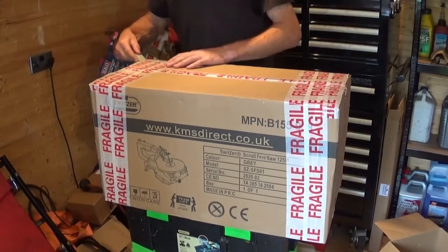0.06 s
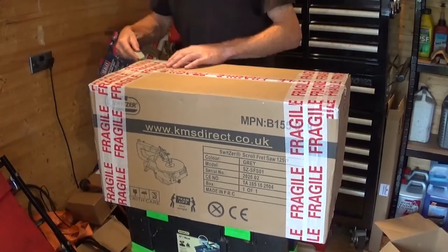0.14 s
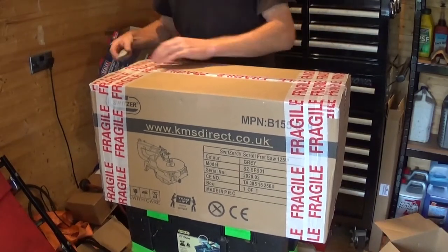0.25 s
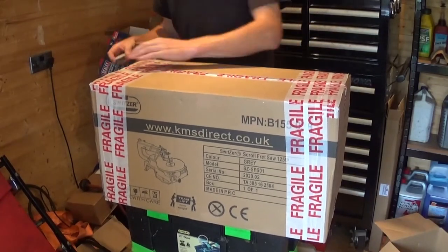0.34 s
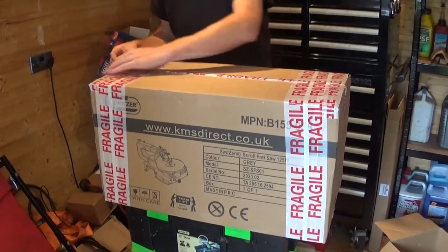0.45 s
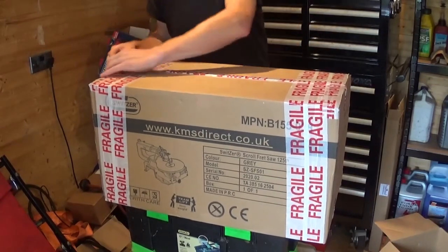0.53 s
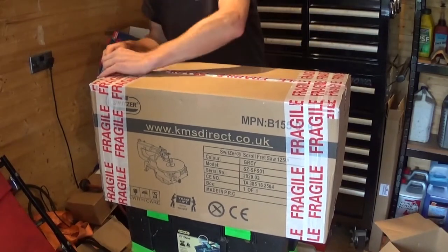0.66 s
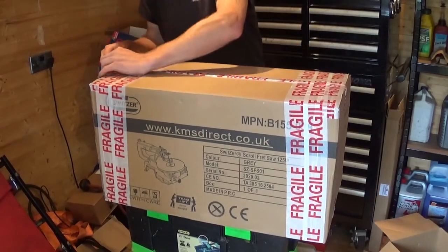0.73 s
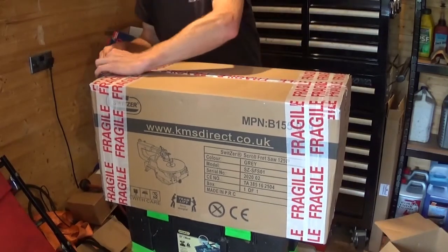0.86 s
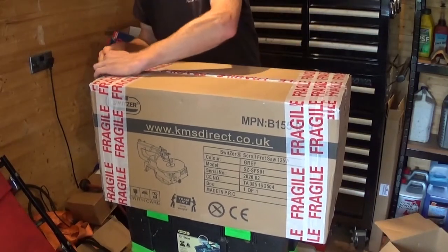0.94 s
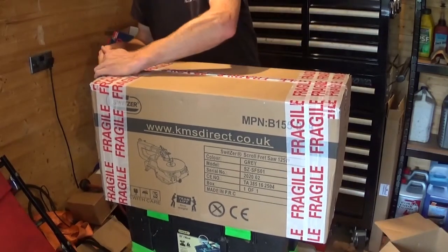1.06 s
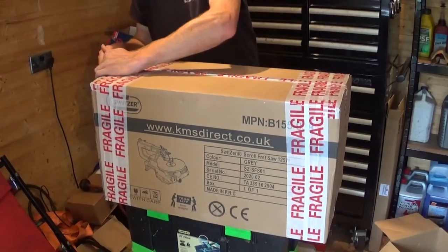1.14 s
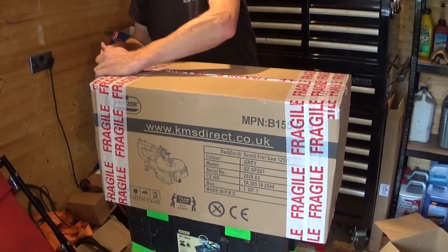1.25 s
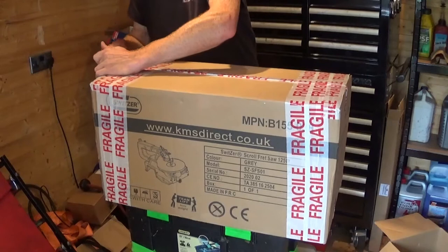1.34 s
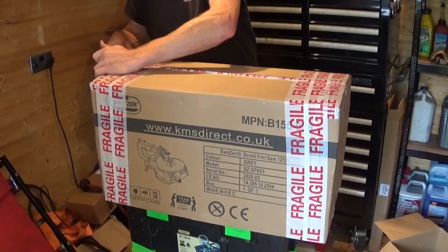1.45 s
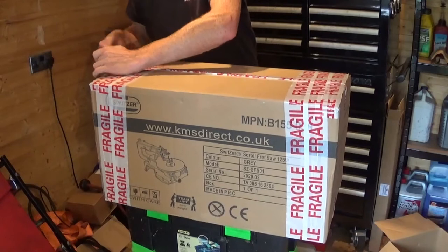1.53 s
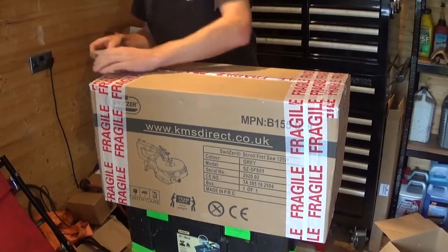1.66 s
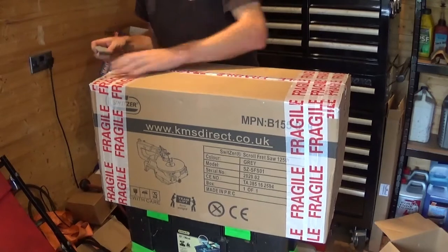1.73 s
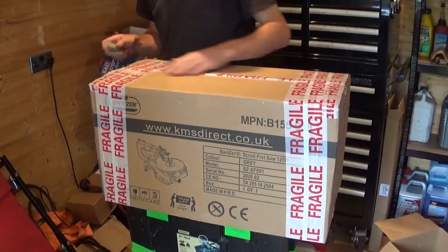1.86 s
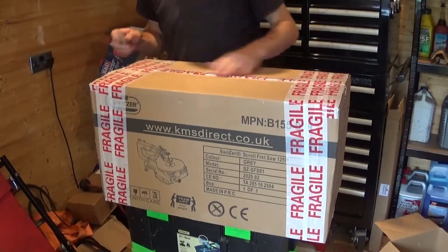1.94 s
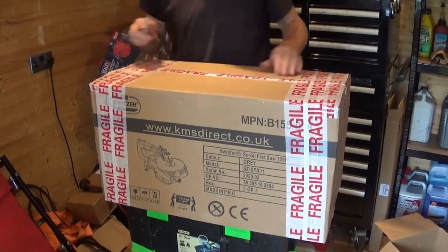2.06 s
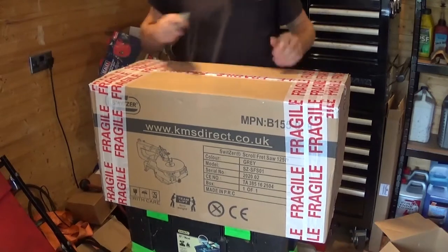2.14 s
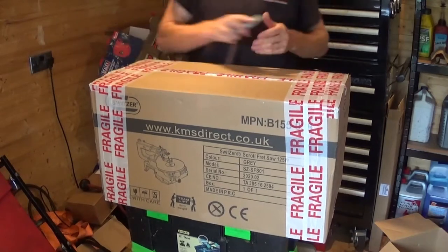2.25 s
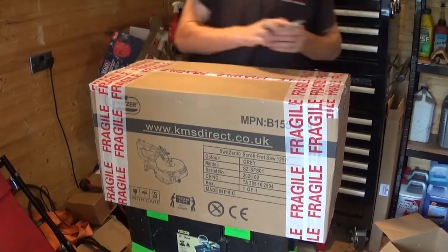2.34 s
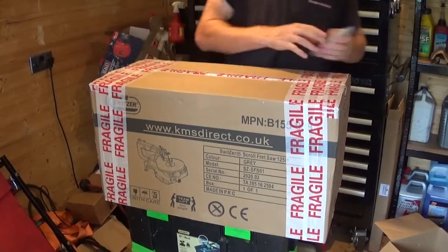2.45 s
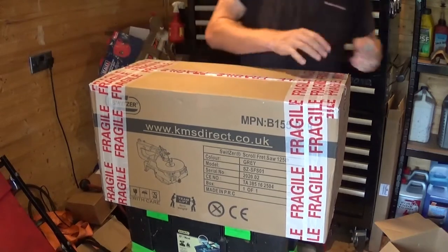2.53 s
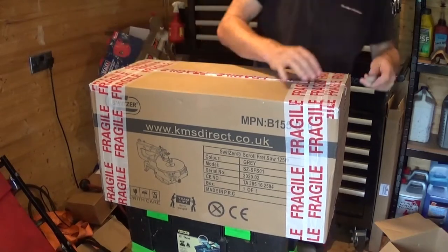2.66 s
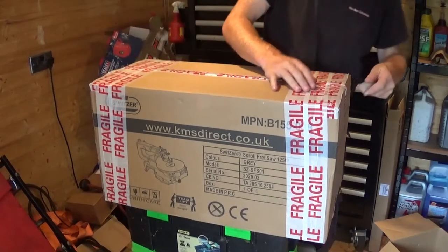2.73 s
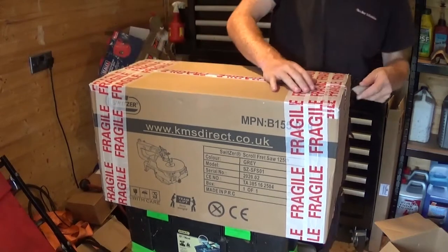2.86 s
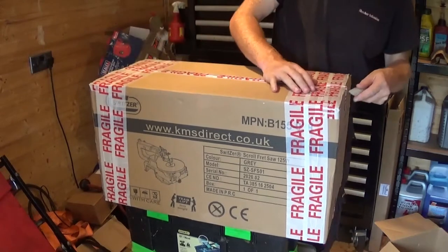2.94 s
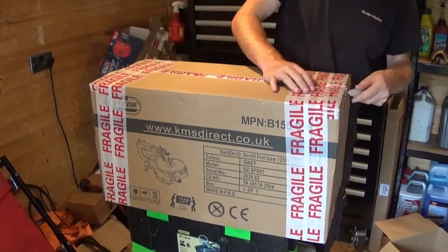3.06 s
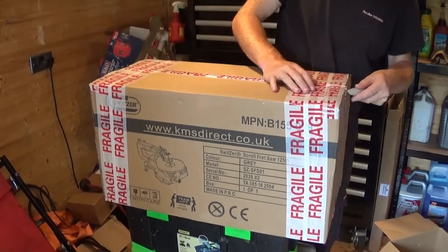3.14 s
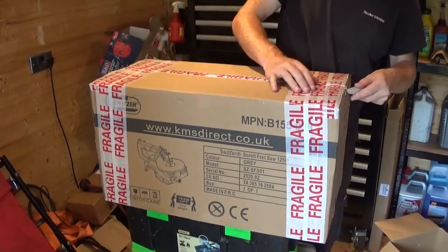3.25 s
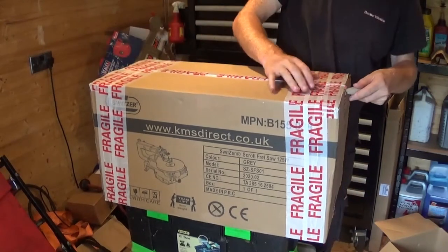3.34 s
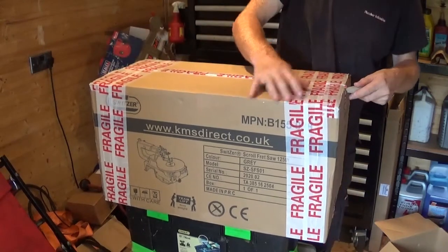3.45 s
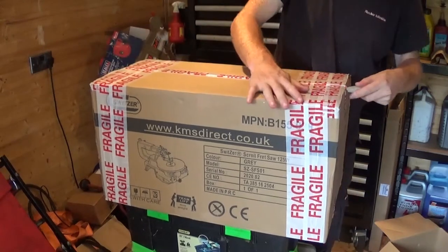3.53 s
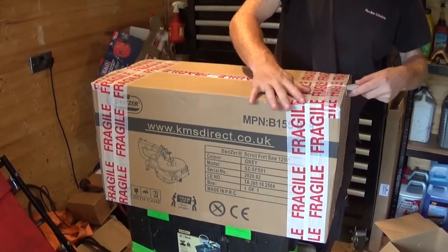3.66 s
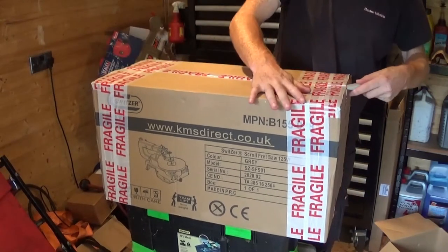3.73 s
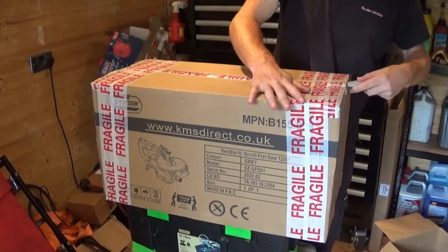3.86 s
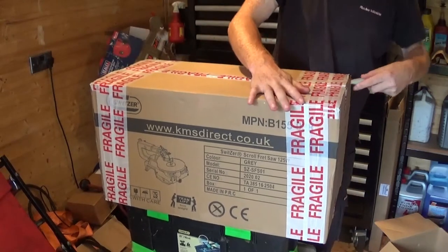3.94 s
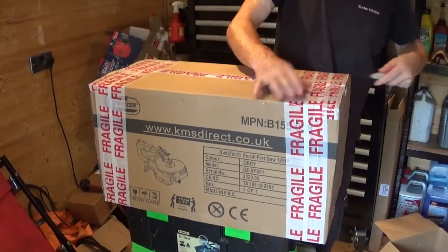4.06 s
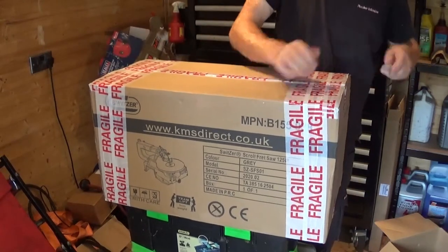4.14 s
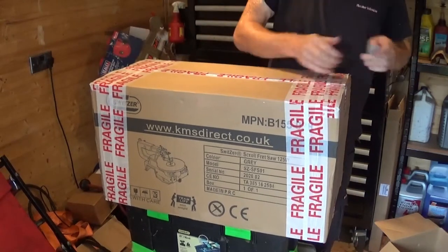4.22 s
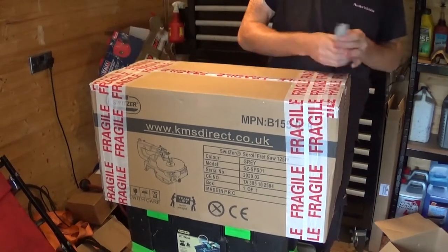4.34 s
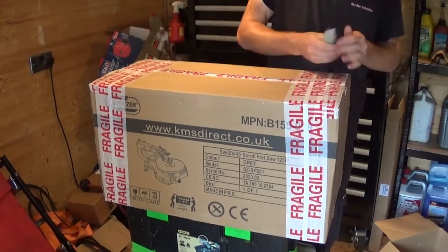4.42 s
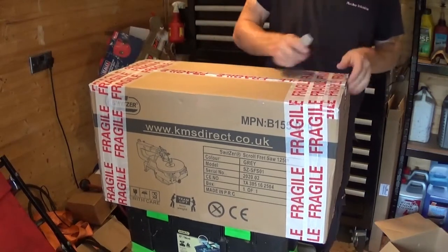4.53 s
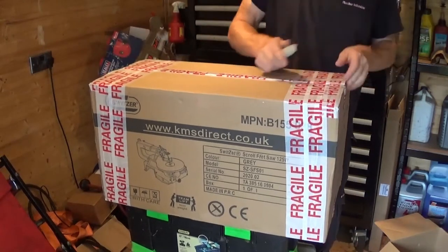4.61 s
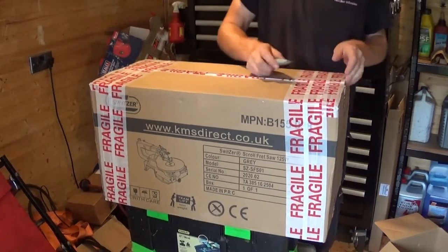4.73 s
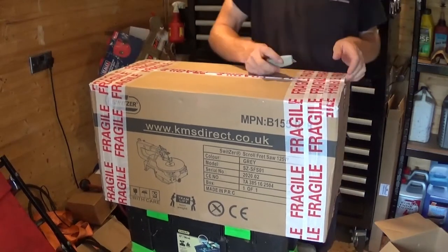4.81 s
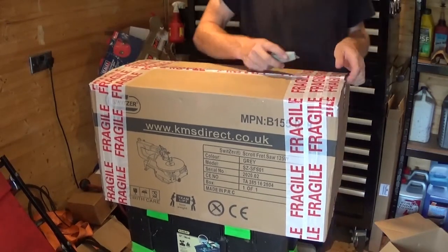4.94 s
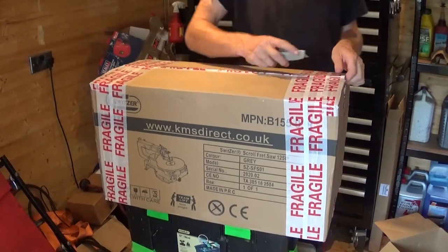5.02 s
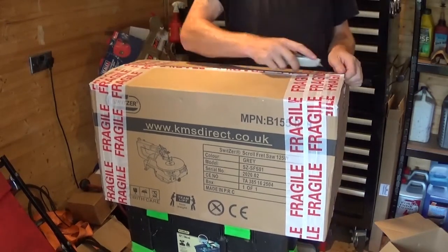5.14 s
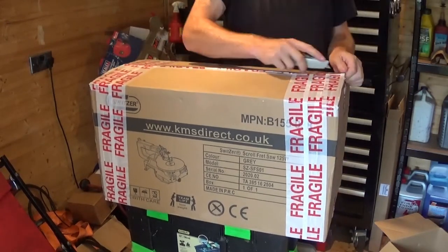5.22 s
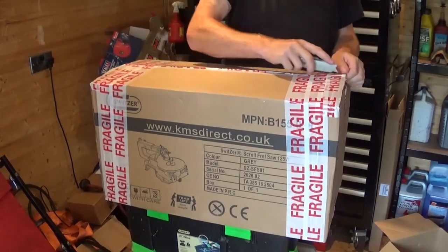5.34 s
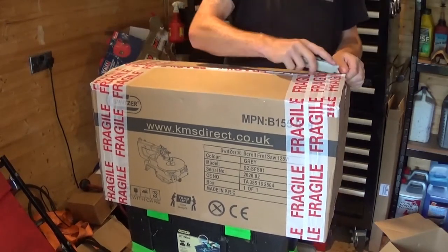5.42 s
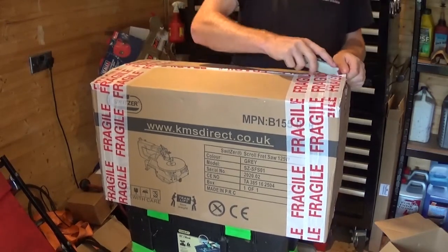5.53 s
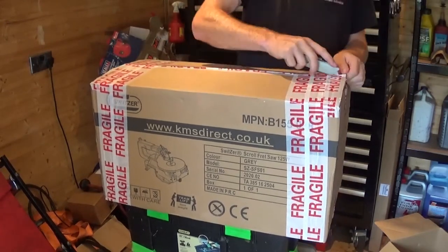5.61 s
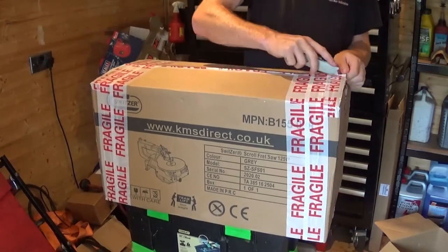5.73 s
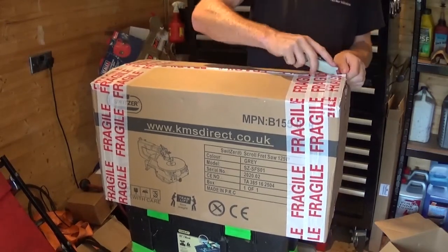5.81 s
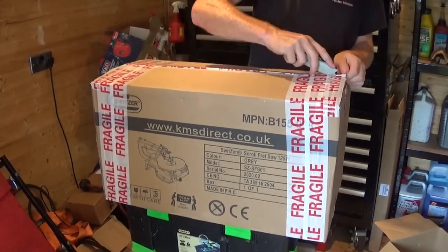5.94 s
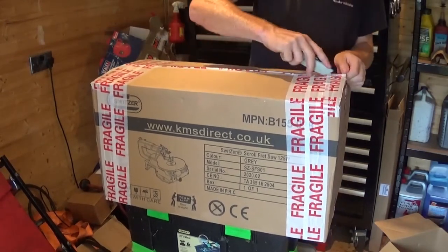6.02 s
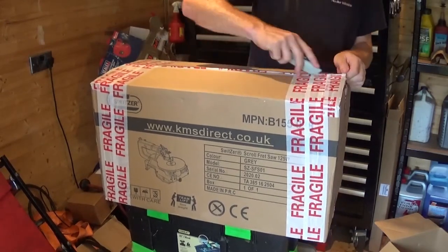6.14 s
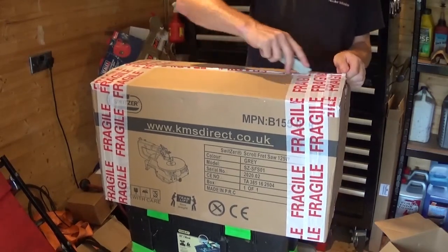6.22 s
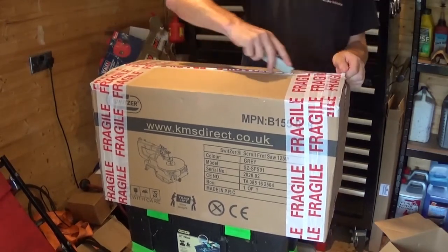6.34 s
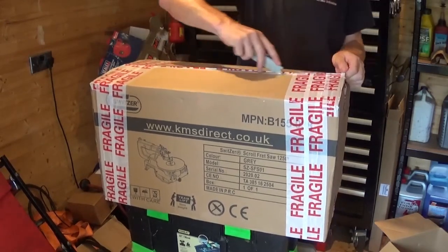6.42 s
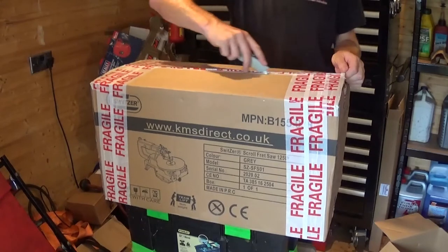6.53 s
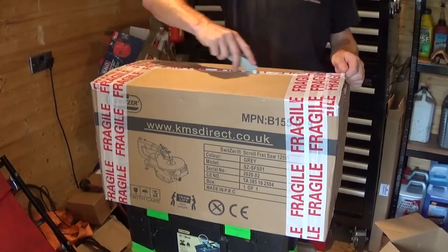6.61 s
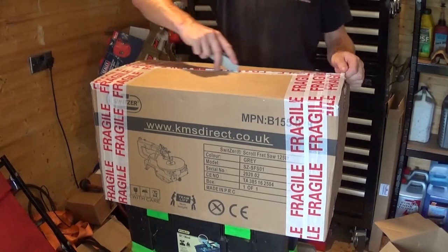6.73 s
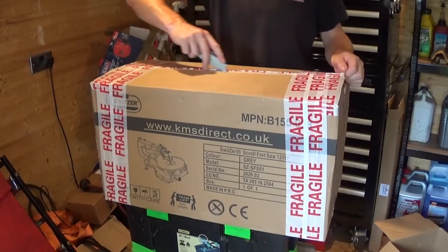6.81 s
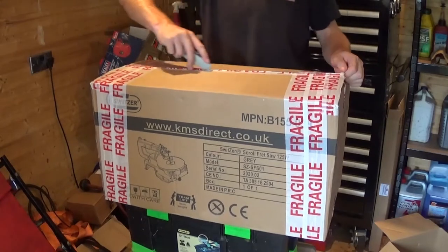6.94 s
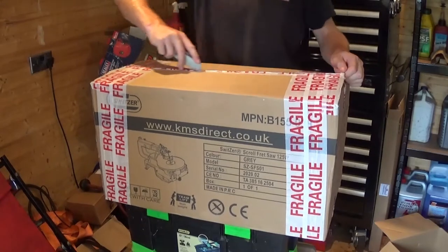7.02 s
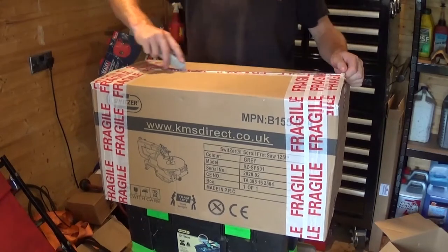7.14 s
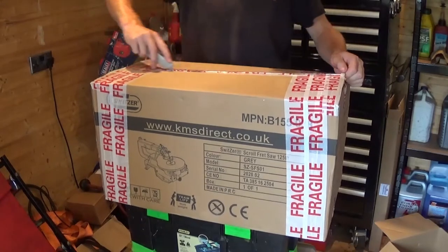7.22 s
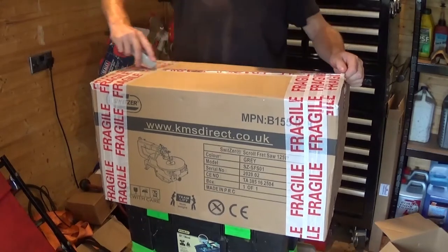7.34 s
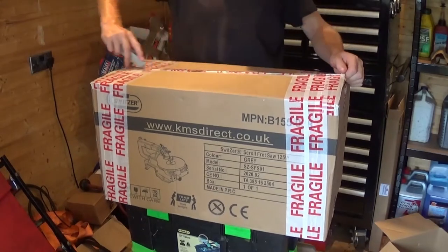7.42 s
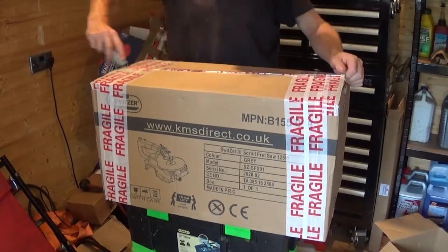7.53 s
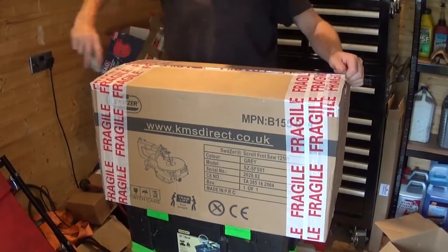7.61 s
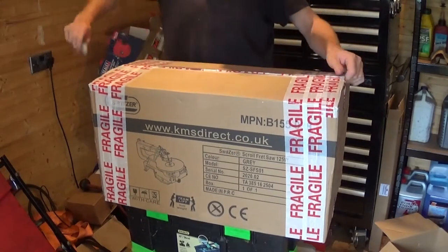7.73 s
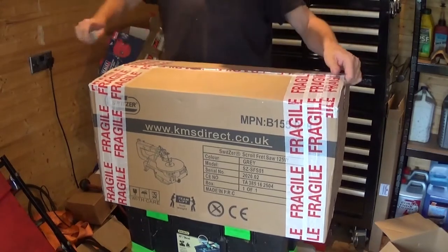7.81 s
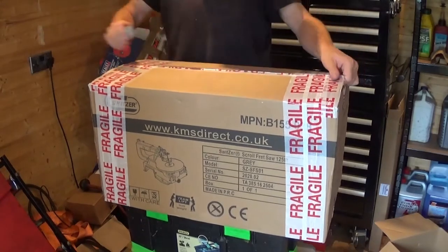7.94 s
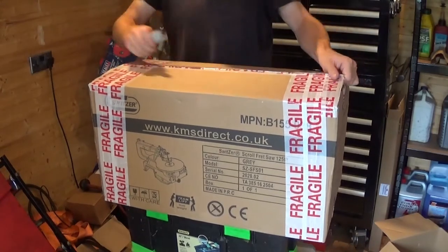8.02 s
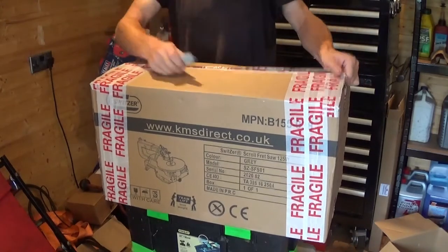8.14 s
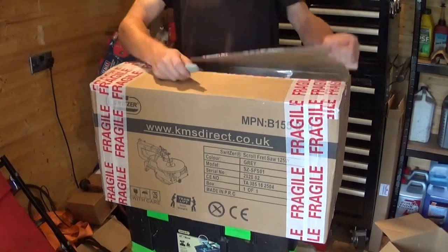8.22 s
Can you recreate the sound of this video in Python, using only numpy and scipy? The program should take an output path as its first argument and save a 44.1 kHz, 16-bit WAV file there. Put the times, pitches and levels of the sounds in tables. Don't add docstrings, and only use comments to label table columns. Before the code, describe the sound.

A utility knife cuts packing tape on a big cardboard box: light scratches and rustles, sharp snaps, one long raspy slit, then hollow thumps.

```python
import sys
import numpy as np
from scipy import signal
from scipy.fft import rfft, irfft, next_fast_len
from scipy.io import wavfile
from scipy.ndimage import uniform_filter1d

SR = 44100
rng = np.random.default_rng(int(sys.argv[2]) if len(sys.argv) > 2 else 0)


def output_pcm(signal):
    pcm = np.clip(np.atleast_2d(signal).T, -1, 1) * 32767
    wavfile.write(sys.argv[1], SR, np.round(pcm).astype(np.int16))


def gain_from_db(level_db):
    decades = np.asarray(level_db, float) / 20
    return 10 ** decades


N = 364707
TIME = np.arange(N) / SR
CONTACT_TIME = TIME[::16]
TOP_HZ = 11050


def level(x, db=0):
    return x * gain_from_db(db) / np.sqrt(np.mean(x ** 2))


def band(x, lo_hz, hi_hz, order=2):
    return signal.sosfilt(signal.butter(order, [lo_hz, min(hi_hz, .45 * SR)], "band", fs=SR, output="sos"), x)


def spectrum_hz(size):
    return np.arange(size // 2 + 1) * SR / size


def colour(x, points):
    hz, db = np.transpose(points)
    size = next_fast_len(N)
    gain = gain_from_db(np.interp(np.log(spectrum_hz(size) + 1), np.log(hz), db))
    return irfft(rfft(x, size) * gain, size)[..., :N]


def split(x, hz, steep=3):
    size = next_fast_len(N)
    low = irfft(rfft(x, size) / (1 + (spectrum_hz(size) / hz) ** (2 * steep)), size)[:N]
    return low, x - low


def resonate(x, modes):
    out = 0
    for k, (hz, width, db) in enumerate(modes):
        out = out + (-1) ** k * gain_from_db(db) * signal.lfilter(*signal.iirpeak(hz, hz / max(width, 15), SR), x)
    return out


def walk(rate):
    k = int(SR / rate)
    held = np.repeat(rng.standard_normal(N // k + 1), k)
    return 0.45 * uniform_filter1d(uniform_filter1d(held, k), k)[:N]


def slips(rate, spread_db, judder_db, judder_rate):
    when, size, sign = rng.random((3, N))
    jerks = (when < rate / SR) * gain_from_db(-spread_db * np.log(size + 1e-9)) * np.sign(sign - .5)
    return jerks * gain_from_db(judder_db * walk(judder_rate))


def patchy(x, db, hold_s, wide_hz):
    hz, s, cells = signal.stft(x, SR, nperseg=512)
    bins, frames = max(int(wide_hz / hz[1]), 1), max(int(hold_s / s[1]), 1)
    field = uniform_filter1d(rng.standard_normal(cells.shape), bins, axis=0)
    field = uniform_filter1d(field, frames, axis=1)
    return signal.istft(cells * gain_from_db(db * field / field.std()), SR, nperseg=512)[1][:N]


def add(out, s, burst):
    i = int(s * SR)
    out[i:i + len(burst)] += burst[:N - i]


# frequency in Hz, density in dB per Hz.
HISS = [(18, -57), (30, -43), (96, -16), (146, -20), (364, -7), (2690, -9), (2970, -10), (3440, -8.5),
        (3990, -13), (9480, -16.5), (11000, -16.5), (14300, -52), (22000, -120)]


def workshop(push):
    mid, side = colour(rng.standard_normal((2, N)), HISS)
    hiss = level(np.array([mid + 0.76 * side, mid - 0.81 * side]), -61) * gain_from_db(1.1 * walk(10.0))
    low = level(band(rng.standard_normal((2, N)), 35, 163))
    rest_db, pushed_db, follow, smooth_s = -95, -52.5, 0.64, 0.025
    sway = gain_from_db(rest_db) + gain_from_db(pushed_db) * uniform_filter1d(push ** follow, int(smooth_s * SR))
    return hiss + (low[0] + 0.19 * np.array([low[1], -low[1]])) * sway


# frequency in Hz, density in dB per Hz.
TAPE = [(1500, -15.5), (2600, -7.5), (3400, -5.5), (5000, -2), (6500, -0.5), (8000, -3), (9600, -0.5),
        (11000, -10), (14000, -2.5)]


def film():
    jerks = level(slips(rate=9000, spread_db=0.0, judder_db=3.0, judder_rate=130))
    fibres = slips(rate=400, spread_db=2.2, judder_db=2, judder_rate=12)
    rubbed = patchy(colour(jerks + gain_from_db(11) * fibres, TAPE), db=2.4, hold_s=.05, wide_hz=500)
    hiss, edge = split(rubbed, 7560)
    slack, hiss = split(level(hiss, -2.1), 3000)
    return hiss, level(edge, -1.05), slack


# frequency in Hz, width in Hz, level in dB.
BOX = [(228, 240, -2.5), (259.6, 14.7, 6.5), (379, 25, -6), (402.6, 13, 5), (521, 17.5, 0), (671, 8.4, 5),
       (946, 14, -11)]
# frequency in Hz, width in Hz, level in dB.
FLAPS = [(1175, 380, 7.5), (1280, 23, -25), (1830, 38, -20), (2210, 620, -71)]


def board():
    coarse = slips(rate=4000, spread_db=1.0, judder_db=2.0, judder_rate=38)
    shaken = resonate(coarse, BOX + FLAPS) + 1.0 * coarse
    shaken = signal.lfilter(*signal.butter(2, 2600, fs=SR), shaken)
    drum, rasp = split(patchy(shaken, db=3.5, hold_s=0.072, wide_hz=250), 830)
    return level(rasp, -1.62), level(drum, -2.26)


def rubbing(gains):
    hiss, edge, slack = film()
    rasp, drum = board()
    return sum(gain * part for gain, part in zip(gains, (hiss, edge, rasp, drum, slack)))


def touch(db, weight, edge_db, rasp_db, slack_db):
    edge = db + edge_db + 0.011 * weight
    rasp = db + rasp_db + 0.43 * weight
    return gain_from_db(2 * np.array([db, edge, rasp, db + weight, db + slack_db]))


def drag(start, length, db):
    bite_s = 0.00043
    after = np.clip(CONTACT_TIME - start - length, 0, 2)
    bite = 20 * np.log10(np.clip((CONTACT_TIME - start) / bite_s, 1e-9, 1))
    return db + bite + np.maximum(-278 * after, -17.5 - 90 * after)


def swell(middle, length, db):
    return db - 10.5 * np.clip(2 * (CONTACT_TIME - middle) / length, -5, 5) ** 2


# start in seconds, drag in seconds, tape hiss in dB, weight on the board in dB.
CUTS = [(0.0, 0.049, -31.5, -23.5), (.376, 0.027, -44.5, -28), (.495, 0.016, -50.5, -25),
        (.615, 0.013, -48.5, -7), (.79, 0.016, -58, -27), (1.4, 0.008, -59, -10), (1.488, 0.011, -45, -8),
        (1.515, 0.018, -49.5, -9), (4.585, .012, -45, -16), (4.886, 0.023, -46, -2), (4.98, 0.018, -56, 7),
        (6.454, 0.0035, -44, -33), (6.634, .008, -34, -3), (6.685, 0.014, -35, -14),
        (6.785, 0.0077, -36.5, -0.5), (6.312, .012, -45, -31), (6.244, 0.009, -47, -18),
        (.543, 0.0099, -42.5, -29), (.595, 0.026, -49, -9), (.709, 0.04, -40.5, -12),
        (.855, 0.021, -47, -36), (1.233, 0.042, -20.5, -19.5), (1.722, 0.014, -44.5, -19),
        (2.826, 0.0033, -47.5, -5), (2.934, 0.0068, -54, -23), (3.342, 0.091, -52.5, 0),
        (3.479, .007, -28, -23), (3.486, 0.035, -27, -12), (3.754, 0.021, -29.5, -19),
        (3.766, 0.021, -24.5, -11), (3.851, 0.0032, -32.5, -3.5), (3.903, 0.0052, -31.5, -12),
        (4.483, 0.03, -50, -4), (5.485, 0.0089, -50, -39), (5.787, 0.012, -23, -13),
        (5.839, 0.03, -24.5, -17.5), (7.082, 0.01, -39, 10), (7.098, 0.041, -30.5, 2.5),
        (7.286, 0.069, -31.5, 4), (7.42, 0.083, -36, -4), (7.343, 0.095, -31.5, -2.5),
        (7.482, 0.012, -32.5, -5), (7.55, 0.0051, -35.5, -46), (8.047, 0.02, -45, -11),
        (8.077, 0.031, -19, -8.5), (8.258, 0.011, -42, -6)]


def cuts():
    return sum(touch(drag(s, length, db), weight, edge_db=1, rasp_db=-0.27, slack_db=3)
               for s, length, db, weight in CUTS)


def walls(x):
    t60_s, tail_db, dull_hz = 0.085, -10.5, 11400
    t = np.arange(SR // 2) / SR
    mid, side = rng.standard_normal((2, len(t))) * 1000. ** (-t / t60_s) * (t > .003)
    side = band(side, 650, 14500, order=1)
    tails = signal.lfilter(*signal.butter(1, dull_hz, fs=SR), [mid + 1.4 * side, mid - 0.87 * side])
    tails = tails * gain_from_db(tail_db) / np.sqrt(np.sum(tails ** 2) / 2)
    return np.array([signal.fftconvolve(x, tail)[:N] for tail in tails])


def camera():
    frame_s, first_tick_s = .04, .0185
    since = (TIME - first_tick_s + frame_s / 2) % frame_s - frame_s / 2
    tone = np.sin(2 * np.pi * (3487 - 9000 * since) * since)
    tick = np.exp(-(since / 0.003) ** 2) * tone * gain_from_db(-51.0 + 1.2 * walk(7.3))
    hum = gain_from_db(-77.5 + 3.1 * walk(10.0)) * np.sin(2 * np.pi * 100 * TIME)
    return tick + hum


# start in seconds, peak in dB, centre in Hz.
BUMPS = [(0.547, -37.5, 465), (0.712, -27.5, 274), (1.492, -35, 890), (2.073, -45.5, 252),
         (2.189, -34, 413), (3.774, -19.5, 527), (4.495, -41.5, 250), (4.614, -41, 237), (4.807, -64, 525),
         (4.888, -36, 410), (4.983, -48, 400), (5.108, -39, 360), (5.349, -45, 330), (6.019, -23, 845),
         (7.102, -24, 980), (7.111, -19, 300), (2.105, -51, 170), (3.46, -48, 170), (5.799, -34.5, 168),
         (7.104, -15, 453), (7.35, -12.5, 1210), (7.37, -19, 1200), (7.301, -19, 1000),
         (7.484, -14.5, 2020), (7.486, -21, 600), (7.36, -23, 297), (6.09, -19.5, 1480), (6.057, -27, 1110),
         (.6, -44, 400), (.635, -46, 400), (.856, -35, 1520), (.872, -33, 2300), (4.586, -42, 2300),
         (5.126, -32, 2320), (1.275, -13.5, 800), (7.168, -18, 313), (7.297, -20, 258), (0.032, -39, 305),
         (1.203, -36, 523), (1.924, -49, 300), (2.671, -47, 210), (3.421, -41.5, 217), (5.168, -37, 333),
         (5.291, -53, 300), (6.417, -26.5, 500), (6.634, -32.5, 272), (7.675, -39, 300), (8.048, -29, 274),
         (8.128, -8.5, 447), (8.136, -10, 1210), (8.152, -12.5, 404), (8.235, -37, 520), (1.445, -41, 600),
         (7.51, -21.5, 400)]


def bumps():
    out = np.zeros(N)
    t = np.arange(6000) / SR
    for s, db, hz in BUMPS:
        push = rng.standard_normal(len(t)) + 12 * (t == 0)
        thud = band(push, 0.67 * hz, 1.69 * hz) * (1 - np.exp(-t / 0.00035)) * np.exp(-t / 0.02)
        add(out, s, gain_from_db(db - 3.75) * thud / np.abs(thud).max())
    return out


# middle in seconds, length in seconds, tape hiss in dB,
# weight on the board in dB.
SWEEPS = [(.47, 0.29, -52, -22), (.26, 0.41, -68, -3), (.58, 0.14, -56, -3), (.69, .06, -55.5, -2),
          (0.797, 0.13, -45.5, -37), (0.922, 0.27, -54.5, -16), (1.178, 0.096, -48, -15.5),
          (1.358, 0.25, -40.5, -18), (1.46, 0.042, -62, -14), (4.835, 0.15, -55, 2.5),
          (5.03, 0.066, -55, -15), (2.098, 0.17, -55.5, -14), (2.304, 0.44, -56, -10),
          (2.55, 0.34, -64, -26), (2.72, 0.25, -56.5, -30), (2.893, 0.12, -55, -29), (2.998, 0.1, -59, -18),
          (3.244, 0.21, -62, -8.5), (3.454, 0.12, -39, -18), (3.71, 0.21, -48.5, -10),
          (3.949, 0.27, -64.5, 8.5), (4.186, 0.036, -54.5, -18), (4.36, 0.34, -56.5, -28),
          (4.62, 0.21, -51, -12), (4.735, 0.099, -50, -17), (4.92, 0.21, -54.5, -10),
          (5.165, 0.13, -42.5, -14.5), (5.603, 1, -65.5, -8), (7.69, 0.11, -45.5, -9),
          (7.769, 0.13, -40, -11.5), (7.927, 0.22, -44, -7.5), (7.61, 0.28, -52.5, -41)]


def sweeps():
    return sum(touch(swell(s, length, db), weight, edge_db=1, rasp_db=-0.27, slack_db=4)
               for s, length, db, weight in SWEEPS)


# middle in seconds, length in seconds, tape hiss in dB,
# weight on the board in dB.
SKIMS = [
    (.135, 0.063, -53, -13),
    (1.69, .03, -56, -14),
    (2.05, 0.065, -67, -22),
    (5.09, 0.1, -51.5, -7.5),
    (5.28, 0.06, -64.5, 7),
    (1.75, 0.044, -41, -38),
    (1.84, 0.18, -34.5, -29.5),
    (1.93, 0.031, -51, -14),
    (1.98, 0.087, -40.5, -37),
]


def skims():
    return sum(touch(swell(s, length, db), weight, edge_db=10, rasp_db=-0.27, slack_db=0.5)
               for s, length, db, weight in SKIMS)


def cracks(events, crackle_s, boost_db):
    out = np.zeros(N)
    t = np.arange(5000) / SR
    for s, db, hz, tail_db in events:
        noise = rng.standard_normal(len(t))
        step = .8 * noise * np.exp(-t / crackle_s) + 2.5 * (t == 0)
        crack = band(step, .65 * hz, min(3.2 * hz, .95 * TOP_HZ))
        ragged = band(noise[::-1] ** 3, 0.78 * hz, 1.29 * hz)
        tail = level(ragged, tail_db) * np.exp(-t / 0.014)
        add(out, s, gain_from_db(db + boost_db) * (crack / np.abs(crack).max() + tail))
    return out


# start in seconds, peak in dB, centre in Hz, frayed tail in dB.
SNAPS = [(0.3755, -41, 5040, -20), (0.71, -28, 1830, -13), (0.7433, -22.5, 6900, -24),
         (0.852, -37, 5740, -20), (0.8704, -29, 8800, -38), (1.2356, -17, 2080, -9),
         (2.662, -29.5, 1680, -9.5), (2.7876, -41, 6600, -22), (2.8225, -34.5, 3900, -1.5),
         (2.9334, -27.5, 2470, -16.5), (2.9455, -35, 2430, -11), (3.006, -38, 3670, -18),
         (3.3405, -34.5, 3830, -7), (3.4096, -30, 6260, -13), (3.6371, -36, 6910, -24),
         (3.7526, -21, 4160, -35), (3.8521, -25, 3880, -8), (3.907, -32, 6100, -18),
         (3.955, -33, 1680, -7.5), (4.1785, -38, 3340, -27), (4.4816, -35, 6030, -24),
         (4.7476, -37, 6130, -10), (5.4824, -22.5, 4030, -39), (5.5483, -35, 3760, -25),
         (7.2943, -26.5, 4200, 0), (7.3861, -13, 1950, -21), (7.4185, -14, 5000, -20),
         (7.4853, -9.5, 4400, -19), (1.4, -30.5, 4900, -3), (1.69, -49, 6690, -15),
         (7.101, -13, 1340, -6.5), (1.516, -37.5, 3650, -2), (1.375, -29, 3500, -10),
         (3.695, -38, 5500, -14), (8.072, -24, 3500, -9), (8.183, -32, 1200, -3), (3.495, -22, 5170, -14),
         (3.509, -18, 5500, -14), (6.4134, -20, 4640, -17), (6.9916, -24, 8740, -25),
         (6.576, -19, 9000, -23)]
# start in seconds, peak in dB, centre in Hz.
STRANDS = [(5.7454, -42.0, 9430), (5.7651, -44.0, 4410), (5.7861, -6.0, 6310), (5.8388, -7.0, 6600),
           (5.9349, -21.0, 6740), (6.0052, -17.0, 5060), (6.021, -11.0, 6580), (6.0576, -12.0, 9000),
           (6.0807, -14.0, 9400), (6.0913, -12.0, 5200), (6.1331, -20.0, 6600), (6.1535, -24.0, 6200),
           (6.157, -21.0, 6230), (6.1739, -23.0, 5930), (6.2062, -8.0, 5200), (6.2441, -7.0, 6900),
           (6.3117, -7.0, 5650), (6.3629, -16.0, 6450), (6.4553, -15.0, 8000), (6.5404, -17.0, 5840),
           (6.6359, -14.0, 5050), (6.698, -18.0, 9330), (6.7884, -18.0, 5380), (7.0869, -17.0, 8590),
           (7.0992, -8.0, 6000), (7.5498, -23.0, 6620), (8.048, -34.0, 8600), (8.0764, -8.0, 7040)]


def snaps():
    strands = [(s - .0001, db, hz, -28) for s, db, hz in STRANDS]
    return cracks(SNAPS, crackle_s=.002, boost_db=0) + cracks(strands, crackle_s=.00025, boost_db=2.5)


# start in seconds, drag in seconds, tape hiss in dB,
# weight on the board in dB.
SCRAPES = [(2.664, 0.031, -50, -9), (.87, 0.019, -49.5, -31), (1.268, 0.02, -35, -0.5),
           (1.9, 0.018, -45.5, -6), (3.955, 0.0082, -48, -18), (6.005, 0.014, -39, -5.5),
           (6.021, 0.0054, -40, 5.5), (6.057, 0.037, -37.5, -2), (5.92, 0.066, -51, -11),
           (7.18, 0.038, -41, 4.5), (7.39, 0.085, -32, -6), (8.128, 0.019, -23, -9.5)]


def scrapes():
    return sum(touch(drag(s, length, db), weight, edge_db=1, rasp_db=5.5, slack_db=3)
               for s, length, db, weight in SCRAPES)


# start in seconds, strength in dB, length in seconds.
RATTLES = [
    (1.605, -63.5, 0.058),
    (2.4, -65, 0.097),
    (2.538, -64.5, 0.097),
    (4.008, -60, 0.034),
    (4.293, -53, 0.0083),
    (4.331, -58, 0.053),
]
# frequency in Hz, width in Hz, level in dB.
BLADE = [(2530, 200, -1), (6070, 230, -8), (6960, 250, -4), (9100, 300, -10)]
# start in seconds, end in seconds, first pitch in Hz, last pitch in Hz, level in dB.
SQUEAK = (5.53, 5.69, 2600, 3900, -62)


def blade():
    shake = np.zeros(N)
    t = np.arange(8000) / SR
    for s, db, length in RATTLES:
        add(shake, s, gain_from_db(db + 23.0) * rng.standard_normal(len(t)) * np.exp(-(t / length) ** 3))
    start, end, low_hz, high_hz, db = SQUEAK
    along = np.clip((TIME - start) / (end - start), 0, 1)
    hz = (low_hz + (high_hz - low_hz) * along) * (1 + 0.035 * walk(440))
    squeak = gain_from_db(db + 2.4 * walk(80)) * np.sin(np.pi * along) * np.sin(2 * np.pi * np.cumsum(hz) / SR)
    ring = resonate(resonate(shake, BLADE), [(hz, width, 0) for hz, width, db in BLADE])
    return ring + squeak


# time in seconds, tape hiss in dB, weight on the board in dB.
SLIT = [
    (6.08, -61, 3),
    (6.13, -44.5, 4.5),
    (6.34, -36, -7),
    (6.47, -37, -5),
    (6.72, -32.5, -8.5),
    (7.08, -35.5, -2),
    (7.23, -30.5, -6),
    (7.28, -40.5, 4.5),
    (7.32, -65, 6),
]


def slit():
    s, db, weight = np.transpose(SLIT)
    hiss_db = np.interp(CONTACT_TIME, s, db, -200, -200)
    return touch(hiss_db, np.interp(CONTACT_TIME, s, weight), edge_db=2, rasp_db=-2, slack_db=-17)


def contact():
    power = cuts() + sweeps() + skims() + scrapes() + slit()
    return [np.interp(TIME, CONTACT_TIME, np.sqrt(p)) for p in power]


def bass_cut(x, hz):
    return signal.sosfilt(signal.butter(7, hz, "high", fs=SR, output="sos"), x)


# time in seconds, left minus right in dB.
LEAN = [
    (0.0, 0),
    (2.12, -1),
    (2.95, -1.0),
    (4.38, -1.5),
    (7.51, -0.5),
    (8.27, -0.5),
]


def scene():
    gains = contact()
    knocks = bumps()
    work = bass_cut(rubbing(gains) + snaps() + blade(), 208) + bass_cut(knocks, 178)
    lean_db = np.interp(TIME, *np.transpose(LEAN)) * np.array([[.5], [-.5]])
    push = 0.78 * gains[0] + 2.6 * gains[3] + gain_from_db(12) * np.abs(knocks)
    return (work + walls(work)) * gain_from_db(lean_db) + workshop(push) + camera()


def band_limit(x):
    return signal.sosfilt(signal.butter(12, 12340, fs=SR, output="sos"), x)


def record(dry):
    steep = signal.cheby2(14, 36, 1.038 * TOP_HZ, fs=SR, output="sos")
    narrow = signal.sosfiltfilt(steep, dry)
    mix = np.tanh(0.58 * narrow) / 0.61
    return band_limit(mix)


dry = scene()
out = record(dry)
output_pcm(out)
```